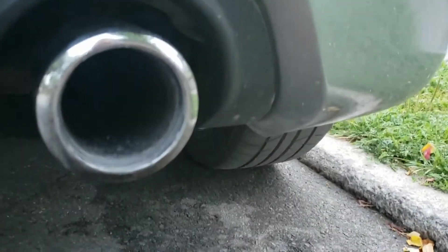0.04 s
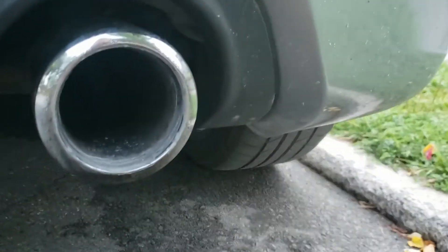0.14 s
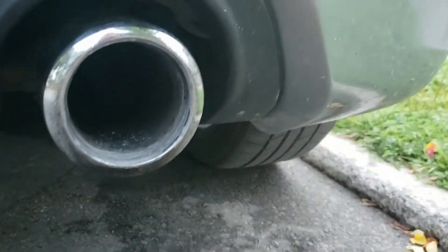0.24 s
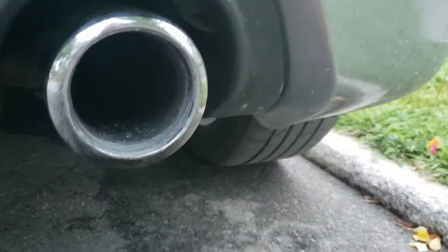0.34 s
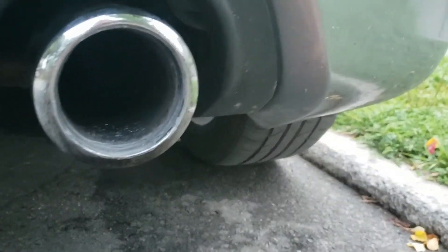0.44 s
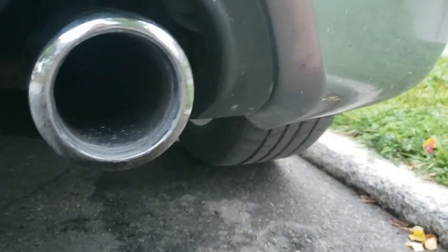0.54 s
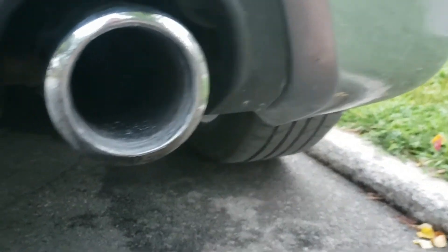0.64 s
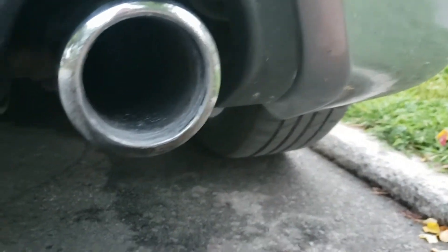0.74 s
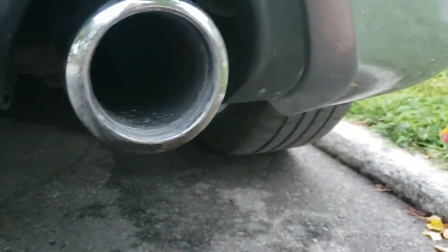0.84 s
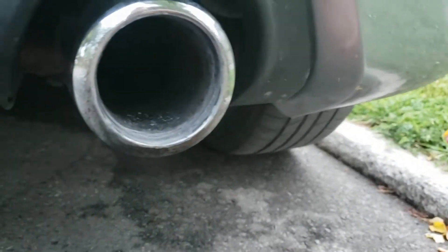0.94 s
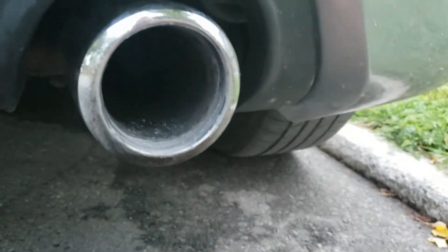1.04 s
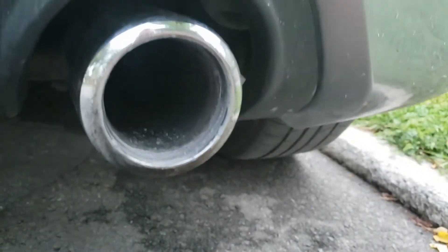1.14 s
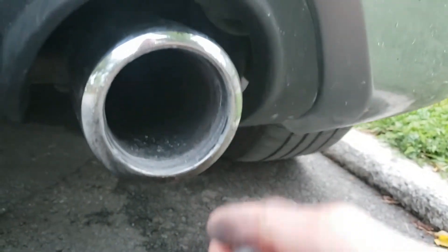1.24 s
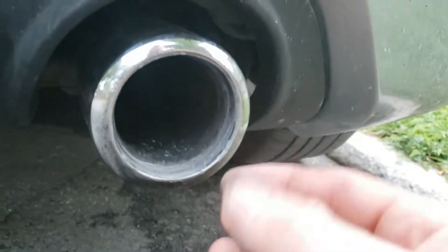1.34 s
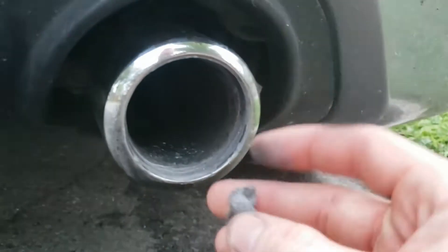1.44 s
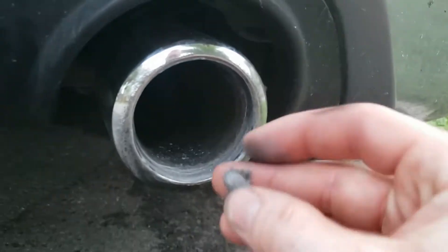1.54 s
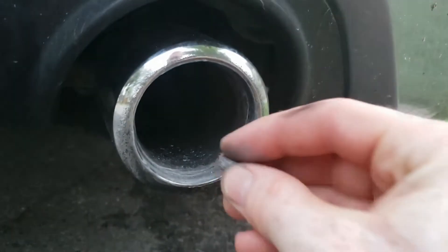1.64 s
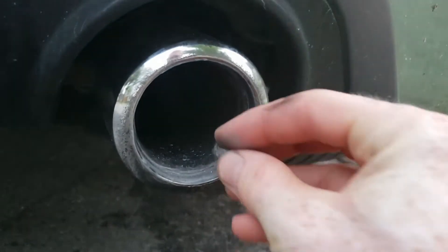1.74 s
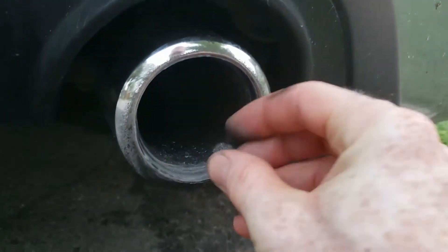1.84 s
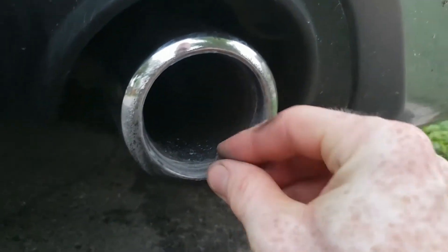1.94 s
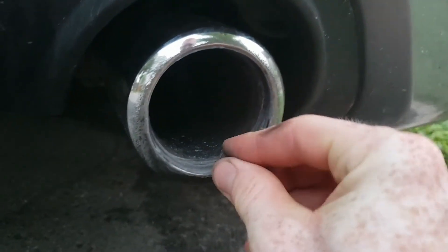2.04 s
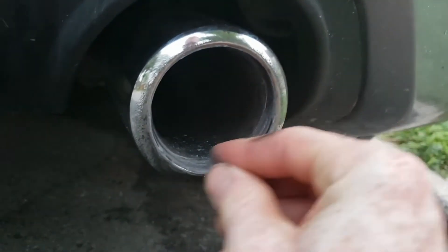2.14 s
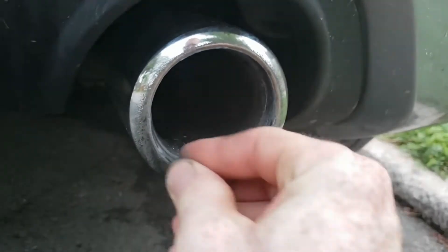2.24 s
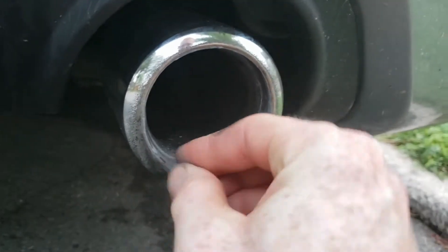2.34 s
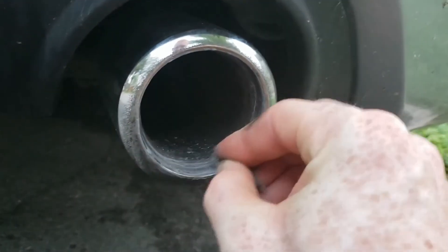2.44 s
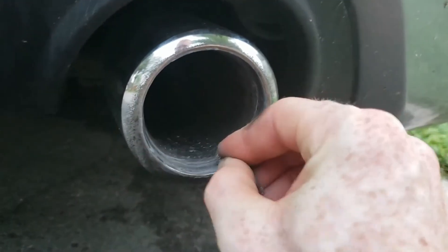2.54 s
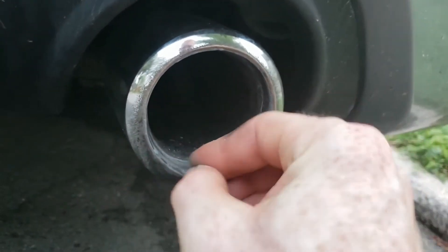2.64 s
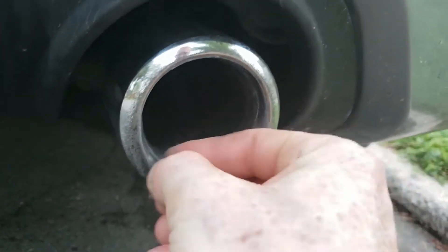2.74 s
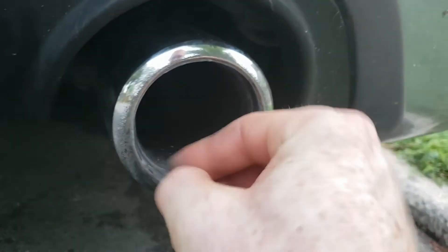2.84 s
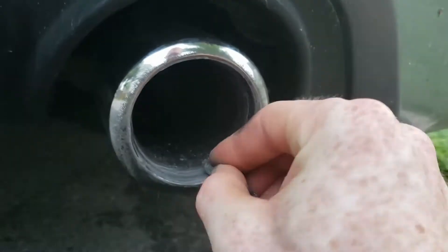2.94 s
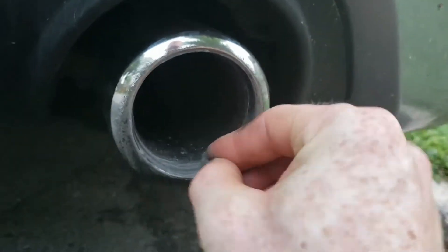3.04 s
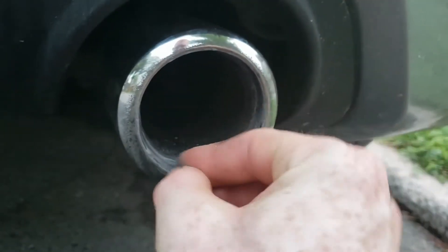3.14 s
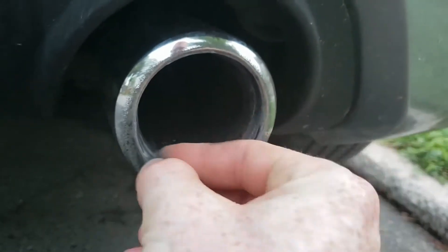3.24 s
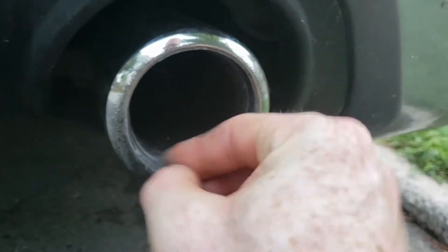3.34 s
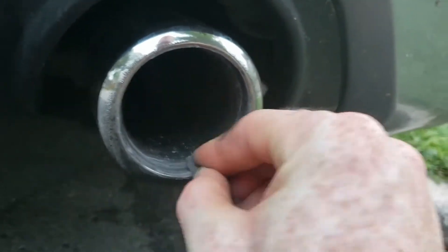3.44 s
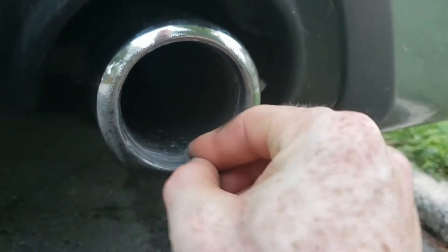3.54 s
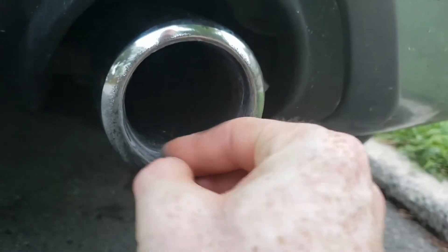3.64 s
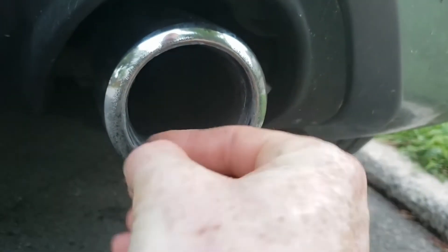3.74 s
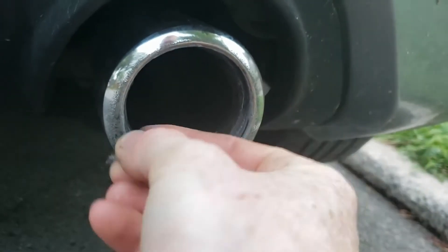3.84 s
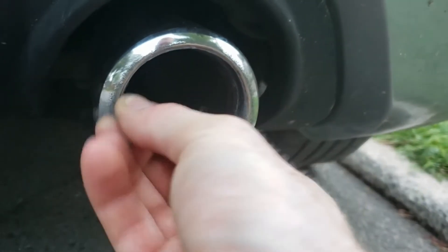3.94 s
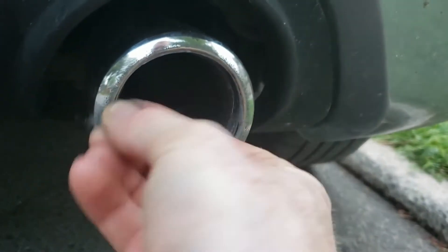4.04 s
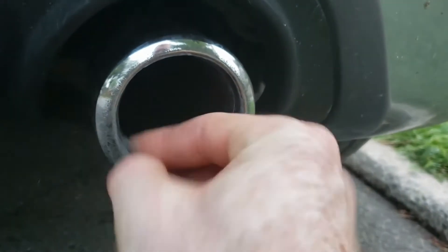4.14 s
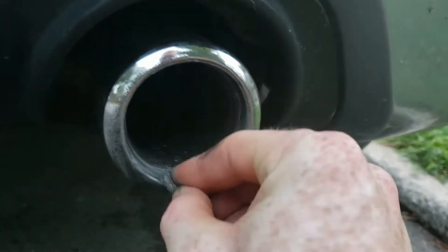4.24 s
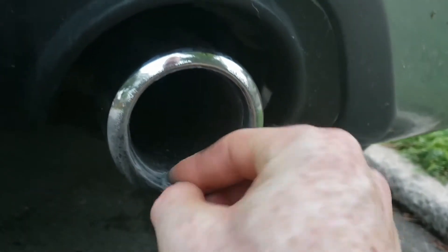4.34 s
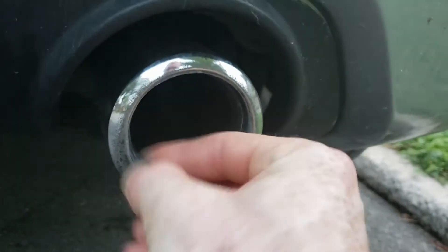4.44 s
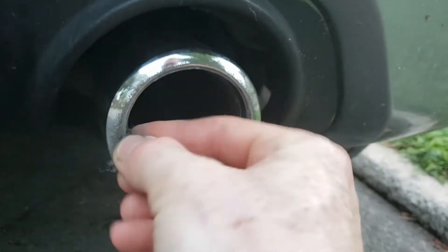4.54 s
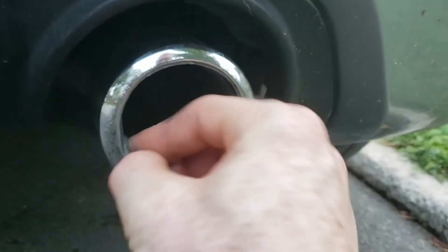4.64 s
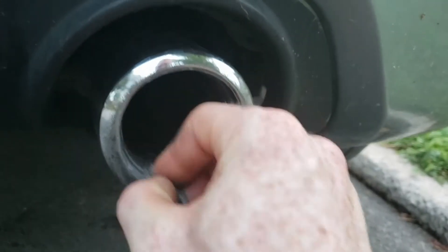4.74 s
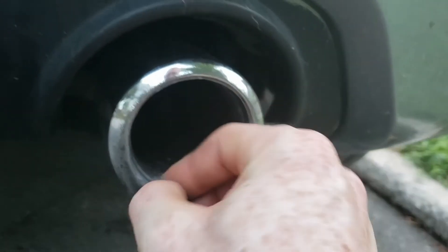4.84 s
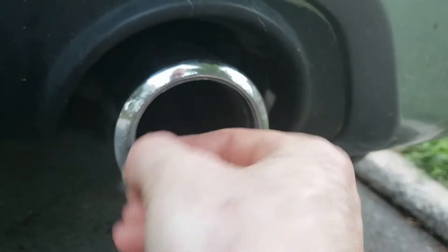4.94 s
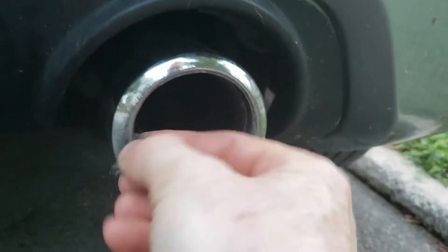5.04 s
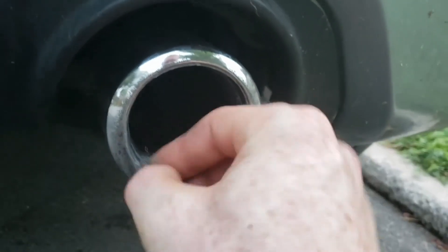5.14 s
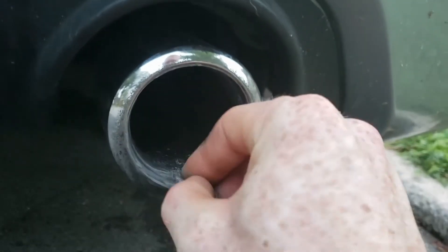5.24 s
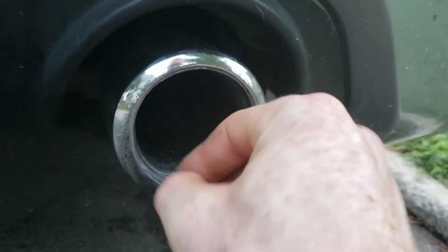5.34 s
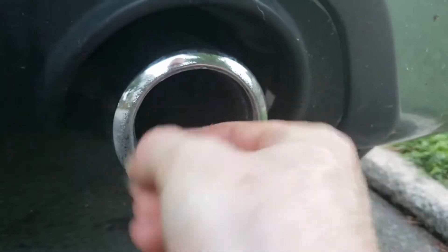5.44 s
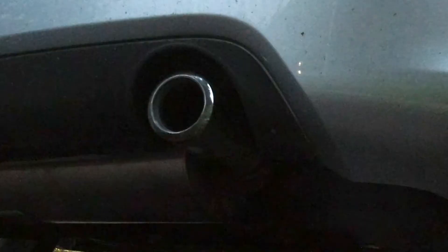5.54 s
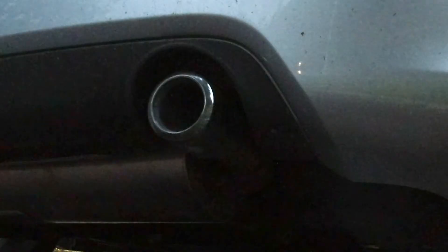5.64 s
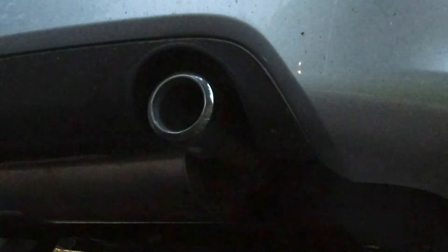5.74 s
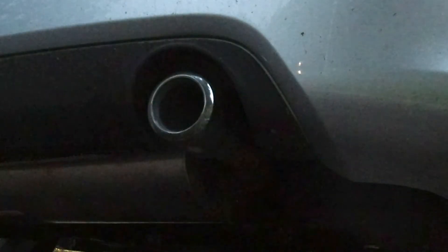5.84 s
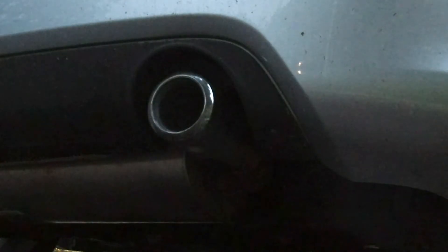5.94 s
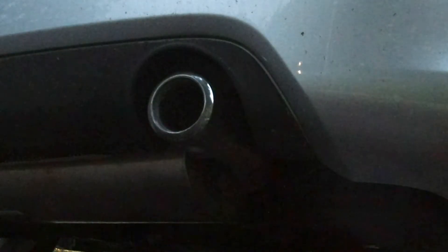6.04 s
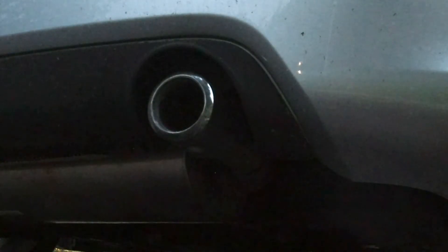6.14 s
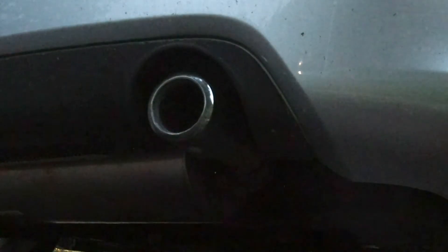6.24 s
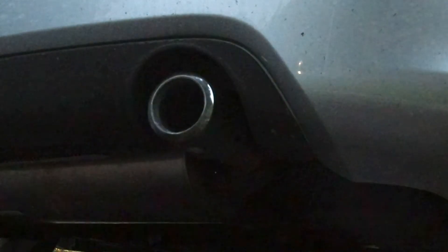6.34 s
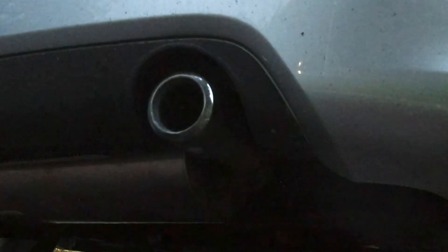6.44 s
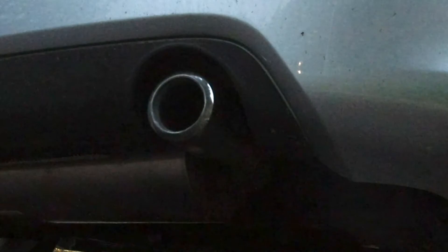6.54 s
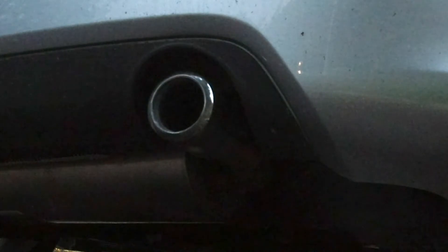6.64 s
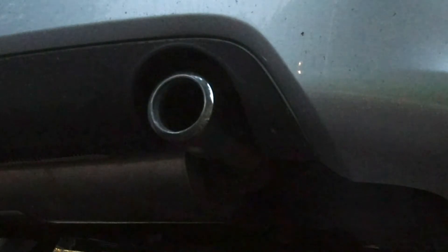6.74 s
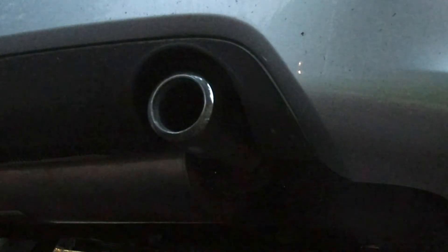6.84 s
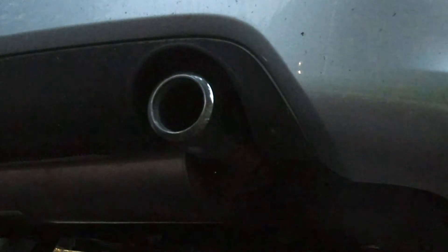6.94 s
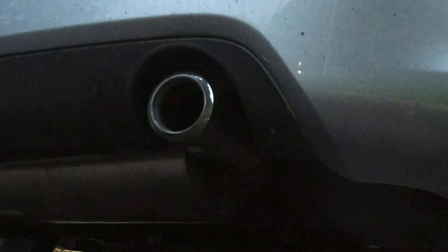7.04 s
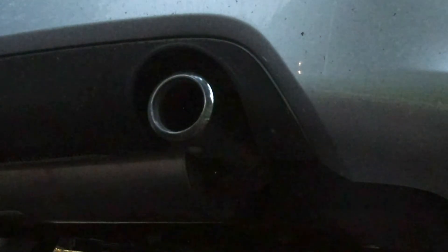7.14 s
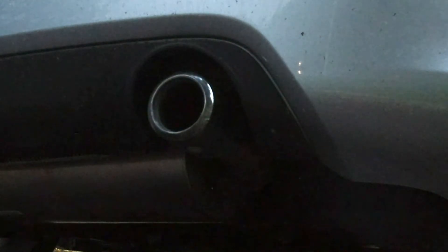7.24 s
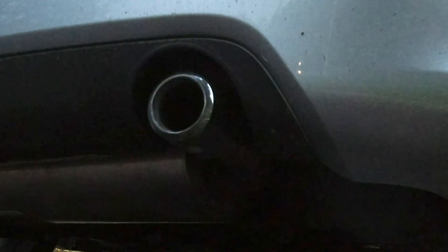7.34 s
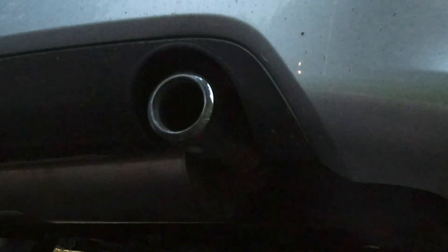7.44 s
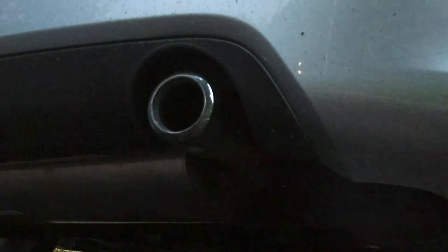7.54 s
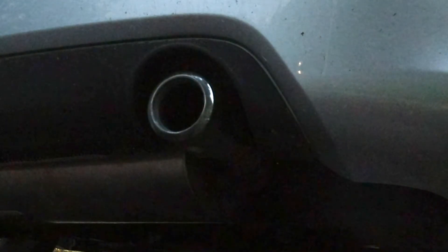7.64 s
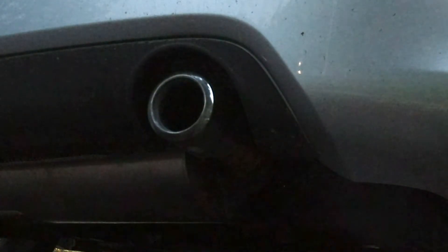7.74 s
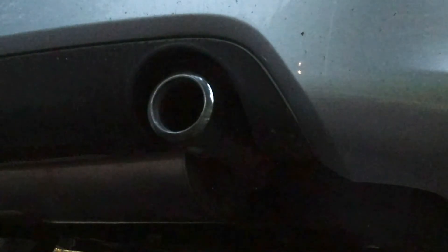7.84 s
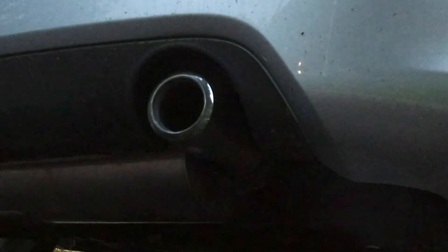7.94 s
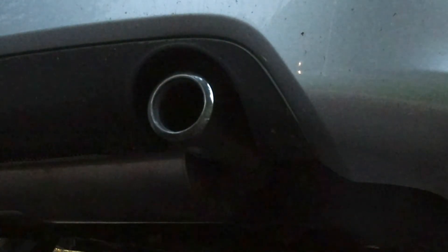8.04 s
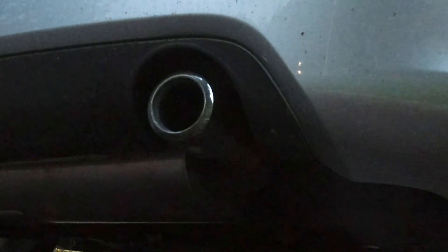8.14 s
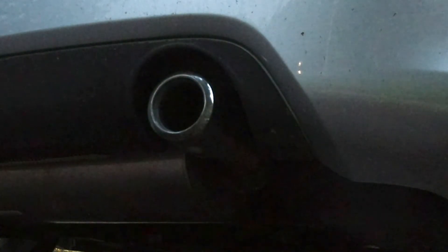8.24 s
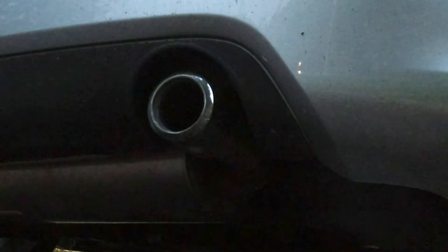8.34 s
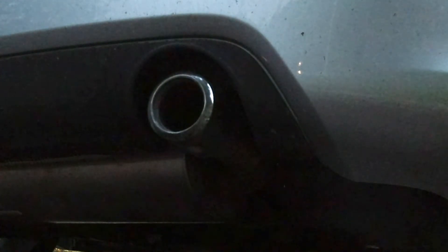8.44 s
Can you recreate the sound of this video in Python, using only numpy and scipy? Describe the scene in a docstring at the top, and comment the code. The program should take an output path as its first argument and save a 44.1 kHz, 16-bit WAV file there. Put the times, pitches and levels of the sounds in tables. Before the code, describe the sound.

Faint traffic rumbles in the open air before quick, uneven rubbing starts near the microphone, a metal pad hissing on an exhaust tip and drawing a light ring from it. Suddenly a starter clacks and chugs six times with a whirring whine. The car engine fires and runs at a fast idle, much louder than the scrubbing, booming and barking right at the tailpipe and faltering briefly twice.

```python
"""Outdoors, close to a car's chrome exhaust tip, with traffic rumbling in the distance.
Fingertips scrub the tip with a small metal pad; each stroke hisses and lightly rings the tube.
Then, at once, the microphone is by a tailpipe: the starter clacks in and cranks through six
compressions, the first puff faint. The engine catches and settles into a loud fast idle,
booming and barking out of the silencer, that stumbles twice."""
import sys
import numpy as np
from scipy import signal
from scipy.fft import rfft, irfft
from scipy.io import wavfile
from scipy.ndimage import uniform_filter1d

SR = 44100
rng = np.random.default_rng(int(sys.argv[2]) if len(sys.argv) > 2 else 0)


def transcribe(u):
    """Save the signal u as a 16-bit wav file named by the first command-line argument.

    u: samples, shape (n,) or (channels, n), limited to [-1, 1]; the rate is SR.
    q: integer samples, one column per channel.
    """
    v = np.clip(np.atleast_2d(u).T, -1, 1)
    q = np.round(v * 32767).astype(np.int16)
    wavfile.write(sys.argv[1], SR, q)


N = 374409
START_S, CATCH_S, IDLE_S = 5.508, 6.38, 6.6  # the starter engages, the engine catches, the idle settles


IDLE_HZ = 51.42
BOOM_DB, BOOM_SAG_DB_PER_S = -22, 1  # the boom eases as the idle settles
OCTAVE_DB, OCTAVE_RISE_DB_PER_S = -44, 5.5  # its octave grows meanwhile
BARK_DB, BARK_SAG_DB_PER_S = -27.1, 0.93
FLARE_S, FLARE_LENGTH_S, FLARE_DB = 6.485, .035, 4  # the boom swells as the revs overshoot once
# The pressure pulse below the silencer's resonances. Each row: frequency in Hz, gain in dB.
PULSE_BASS = [(10, -9), (50, -8)]
# The silencer, heard at the pipe's mouth. Each row: multiple of the idle firing rate, gain in dB.
SILENCER = [(1, -0.5), (2, -19), (3, -10.5), (4, -8), (5, -17), (6, -17), (7, -22.5), (8, -34), (9, -32),
            (10, -20), (11, -37), (12, -33), (13, -31), (14, -31), (15, -49), (16, -48.5)]
def exhaust(cycles):
    """Close to the tailpipe, every firing booms out of the silencer with a sharp bark on its crest."""
    age = np.maximum(clock() - CATCH_S, 0)
    uneven_db, boom_loss_db, bark_loss_db = stumbling()
    boom_db = BOOM_DB - BOOM_SAG_DB_PER_S * age - boom_loss_db + FLARE_DB * bell(FLARE_S, FLARE_LENGTH_S)
    bark_db = BARK_DB - BARK_SAG_DB_PER_S * age - bark_loss_db + 0.67 * wander(12)
    firings = np.flatnonzero(np.diff(np.floor(cycles)))
    size_luck, timing_luck, boom_luck = rng.standard_normal((len(firings), 3)).T
    scatter_db = 0.51 + uneven_db[firings]
    alternation_db = .2 * (-1) ** np.arange(len(firings))
    jitter = (.00015 * SR * scatter_db * timing_luck).astype(int)
    pulses = np.zeros(N)
    pulses[np.clip(firings + jitter, 0, N - 1)] = undb(alternation_db - .8 * scatter_db * abs(size_luck))
    pipe = colour(pulses, PULSE_BASS + [(k * IDLE_HZ, db) for k, db in SILENCER[1:]])
    bark = pipe / pipe[:, int(IDLE_S * SR):].std() * undb(bark_db)
    unevenness = np.interp(np.arange(N), firings, undb(0.76 * scatter_db * boom_luck))
    phase = 2 * np.pi * (cycles + 0.1)  # the slow swell of pressure leads the bark a little
    boom = np.cos(phase) * undb(boom_db)
    octave = np.cos(2 * phase) * undb(OCTAVE_DB + OCTAVE_RISE_DB_PER_S * age)
    return np.sqrt(2) * (boom + octave) * unevenness + bark


# Uneven firing, once at the catch and twice at idle. Each row: centre and half-length in seconds,
# then scatter, loss of boom and loss of bark in dB.
STUMBLES = [(6.423, .05, 3.5, 2.5, -1), (7.178, 0.057, 3, 5, 5), (7.92, 0.034, 1.5, 3, 3)]
def stumbling():
    """Firings come weak and out of step: scatter, loss of boom and loss of bark over time, in dB."""
    return sum(np.outer(depths, bell(s, length)) for s, length, *depths in STUMBLES)


# Tone of the gas rush, the stumbles' rumble and the spits. Each row: frequency in Hz, gain in dB.
GAS_COLOUR = [(20, 1), (80, -2.5), (140, -2), (280, -1), (380, -8.5), (460, -3), (550, -9), (590, -15),
              (650, -11.5), (690, -5), (730, -15.5), (790, -18.5), (1000, -17), (1500, -35.5)]
RUMBLE_COLOUR = [(60, -8), (100, 1), (160, -5), (260, -13.5), (420, -19.5)]
SPIT_COLOUR = [(250, -9), (480, 4.5), (720, 1), (900, -19), (1300, -19.5)]
# Harder spits of gas. Each row: start in seconds, level in dB, decay in seconds.
SPITS = [(6.527, -35, 0.014), (6.756, -45, 0.0085), (7.044, -37, 0.011), (7.084, -32, 0.013),
         (7.383, -36.5, 0.0081), (7.48, -36, .012), (8.397, -41, 0.009)]
def gas_flow(throb):
    """Gas rushes out after each firing, spits now and then, and rumbles in the silencer in a stumble."""
    rush = car_noise() * throb
    gas = unit_rms(colour(rush, GAS_COLOUR)) * undb(-41.3 + wander(14))
    scatter_db = stumbling()[0]
    rumble = unit_rms(colour(rush, RUMBLE_COLOUR)) * undb(-42) * scatter_db
    spits = unit_rms(colour(rush, SPIT_COLOUR)) * bursts(SPITS)
    return gas + rumble + spits


# Machinery hiss, heard from the tailpipe. Each row: frequency in Hz, gain in dB.
MACHINE_COLOUR = [(600, -14), (950, 2), (1200, -7), (1550, -5.5), (2000, -8), (2250, -7.5), (2600, -6.5),
                  (3200, -9.5), (3800, -11.5), (4600, -18.5), (6200, -18.5), (7200, -24), (9000, -20.5),
                  (10200, -22.5), (15800, -20)]
# Its whistling resonances. Each row: frequency in Hz, width in Hz, gain in dB.
MACHINE_MODES = [(1420, 52, 1), (1765, 22, -3), (2560, 55, 4), (3110, 70, 1), (8600, 41, -5),
                 (8940, 100, -3.5), (11300, 190, -14), (15400, 80, -5)]
def machinery(throb):
    """The machinery hisses and whistles behind the exhaust, loudest just after the engine catches."""
    clatter = metal_wall(car_noise(), decay=0.006, direct_db=10)
    clatter = clatter * undb(wander(300) + 0.88 * wander(18)) * (1 + 0.13 * throb)
    hiss = unit_rms(colour(clatter, MACHINE_COLOUR), 1510, 14400)
    whistle = undb(-11) * unit_rms(ring(clatter, MACHINE_MODES))
    flare = 1 + bursts([(6.375, 4, 0.125)])
    return (hiss + whistle) * flare * undb(-53.5)


# Speed of the running engine. Each row: time in seconds, firing rate in Hz.
FIRING_RATE = [(6.38, 42.03), (6.43, 45.9), (6.48, 54.5), (6.5, 55), (6.56, 51.9), (6.73, 52.7),
               (7.02, 52.17), (7.16, 48), (7.25, 50.88), (7.4, 51.55), (7.55, 50.07), (7.77, 51.67),
               (7.94, 50.02), (8.08, 51.14), (8.2, 49.35), (8.42, 49.1), (8.49, 50)]
def engine():
    """The running engine: its firings pace the exhaust, the gas flow and the machinery."""
    times, rates = np.transpose(FIRING_RATE)
    firing_hz = uniform_filter1d(np.interp(clock(), times, rates), size=400)
    cycles = np.cumsum(firing_hz) / SR
    cycles -= np.interp(7.083, clock(), cycles)  # one firing falls on the hardest spit
    throb = 1.3 + np.exp(-(cycles % 1) / 0.14)
    return (gas_flow(throb) + machinery(throb) + exhaust(cycles)) * fade(6.36, 6.39)


PUFF_HZ, PUFF_DECAY_S = 23, .043
# Compressions while cranking. Each row: time in seconds, puff of air in dB, clash of gear teeth in dB.
COMPRESSIONS = [(5.545, -45, -35.5), (5.687, -28.5, -39.5), (5.853, -25, -31), (5.992, -26, -32),
                (6.131, -24.5, -32.5), (6.268, -25, -43)]
# The first two firings. Each row: time in seconds, level in dB, swing in Hz, decay in seconds.
FIRST_FIRINGS = [(6.323, -18, 58, .029), (6.361, -15, 56.5, 0.013)]
def puffs():
    """Each slug of air leaves the pipe as a pressure peak that swings out slowly."""
    cranking = [(s, db, PUFF_HZ, PUFF_DECAY_S) for s, db, _ in COMPRESSIONS]
    pressure = 0
    for s, db, hz, decay in cranking + FIRST_FIRINGS:
        age = clock() - s
        rise = np.exp(-abs(age) * hz * 7)
        swing = np.cos(2 * np.pi * hz * age) * np.exp(-abs(age) / decay)
        pressure = pressure + undb(db) * np.where(age < 0, rise, swing)
    return pressure


OVERRUN_S, OVERRUN_HOLD_S = 6.285, 0.083  # the catching engine spins the starter free
# The pinion striking the ring gear. Each row: start in seconds, level in dB, decay in seconds.
CLACKS = [(5.5105, -25.5, 0.0053), (5.5145, -29.5, 0.0057), (5.523, -31, 0.015)]
# Tone of those strikes. Each row: frequency in Hz, gain in dB.
CLACK_COLOUR = [(120, -47), (200, -5), (485, -15), (581, -7), (946, -1), (1310, -8.5), (2550, 1),
                (2950, -5), (4090, -11), (4550, -6.5), (5550, -17), (12500, -21.5), (15000, -33)]
def starter():
    """Heard from the tailpipe, the pinion clacks in and the starter labours until the engine catches."""
    age = np.clip(clock() - START_S, 0, OVERRUN_S - START_S)
    surge = cranking_surge()
    overrun = undb(hump(OVERRUN_S, OVERRUN_HOLD_S, attack=0.037, release=.085))
    rattle = gear_rattle(overrun)
    chugs = gear_chugs()
    running = rattle + motor_whirr(age, surge, overrun) + gear_whine(age, surge) + body_drone(age, surge)
    clack = unit_rms(colour(car_noise(), CLACK_COLOUR)) * bursts(CLACKS)
    return clack + chugs + running * fade(START_S, 5.52) * (1 - fade(6.39, 6.48))


def cranking_surge(lag_s=0.032):
    """Swing of the cranking speed from -1 to 1: each compression brakes the starter, then lets it race."""
    fastest = np.array(COMPRESSIONS)[:, 0] + lag_s
    return np.cos(2 * np.pi * np.interp(clock(), fastest, np.arange(len(fastest))))


# Tone of the clashing teeth. Each row: frequency in Hz, gain in dB.
CHUG_COLOUR = [(200, -13.5), (360, -3), (520, -14), (700, -9), (950, -0.5), (1350, -10.5), (1800, -1),
               (2200, -6.5), (2800, -8), (3300, -12.5), (5300, -22), (7500, -27.5)]
def gear_chugs(lag_s=.065, decay_s=0.04):
    """The teeth are thrown together as each compression lets go."""
    blows = bursts([(s + lag_s, db, decay_s) for s, _, db in COMPRESSIONS])
    clash = colour(car_noise() * undb(1.2 * wander(500)), CHUG_COLOUR)
    return unit_rms(clash, 690, 3600) * uniform_filter1d(blows, size=600)


# Resonances of the starter gears. Each row: frequency in Hz, width in Hz, gain in dB.
GEAR_MODES = [(988, 57, 6), (1497, 17, 8), (1890, 56, 1), (2355, 93, 1), (2740, 130, 0), (4080, 40, -3),
              (4580, 78, -7), (5220, 66, -5)]
# Their broad noise. Each row: frequency in Hz, gain in dB.
GEAR_COLOUR = [(350, -34.5), (600, -13), (977, -1), (1410, -10), (1890, -9), (2160, -4), (2400, 1),
               (3330, -11), (8000, -28), (10400, -47), (17600, -120)]
def gear_rattle(overrun):
    """Rattling teeth ring the gears, harder as the starter spins free."""
    teeth = car_noise() * undb(3.3 * wander(1500) + 1.1 * wander(90))
    gears = unit_rms(ring(teeth, GEAR_MODES)) + undb(-1) * unit_rms(colour(teeth, GEAR_COLOUR))
    dulled = signal.sosfilt(signal.butter(2, 4500, fs=SR, output="sos"), gears)
    return unit_rms(dulled, 950, 2700) * undb(-46) * (1 + 0.59 * overrun)


WHIRR_DB, WHIRR_RISE_DB_PER_S, WHIRR_SWING_DB, OVERRUN_DB = -61, 20.5, 4.5, -41
# Tone of the starter motor. Each row: frequency in Hz, gain in dB.
WHIRR_COLOUR = [(3000, -7.5), (4000, 2), (4500, -4.5), (5300, -1.5), (6800, -7.5), (9000, -5.5),
                (12500, -6.5), (14500, -20), (15800, -17)]
def motor_whirr(age, surge, overrun):
    """The motor's whirr grows and surges with the cranking, then peaks as it spins free."""
    cranking = undb(WHIRR_DB + WHIRR_RISE_DB_PER_S * age + WHIRR_SWING_DB * surge)
    cranking *= 1 - fade(OVERRUN_S, CATCH_S)
    motor = colour(metal_wall(car_noise(), decay=0.0054, direct_db=-1), WHIRR_COLOUR)
    return unit_rms(motor, 6050, 15000) * np.maximum(cranking, undb(OVERRUN_DB) * overrun)


def gear_whine(age, surge, full_speed_hz=4250, spin_up_s=.045):
    """Two sets of gears mesh at different rates, each wavering in level on its own."""
    mesh_hz = full_speed_hz * (1 - np.exp(-age / spin_up_s)) * (1 + .07 * surge)
    warble = 1 + .027 * np.array([wander(600), wander(600)])
    phase = 2 * np.pi * np.cumsum(mesh_hz * warble, axis=1) / SR
    low = undb(-50 + 4 * wander(35)) * np.sin(phase)
    high = undb(-54 + 3.4 * wander(35)) * np.sin(phase * 6 / 5)
    return (low + high) * fade(5.57, 5.7) * (1 - fade(6.2, 6.35))


# Low resonances of the body. Each row: frequency in Hz, width in Hz, gain in dB.
BODY_MODES = [(90.1, 40, 5), (129, 55, -5), (259, 56, 0), (342.4, 36, -1.5), (517, 43, -5), (734, 52, -9)]
def body_drone(age, surge, rise_db_per_s=7):
    """The body drones under the cranking, louder whenever the starter slows."""
    drone = unit_rms(ring(car_noise(), BODY_MODES), 200, 700)
    return drone * undb(-50 + rise_db_per_s * age - 1.5 * surge)


STROKE_ATTACK_S, STROKE_RELEASE_S, RING_RELEASE_S = .06, 0.05, 0.078
STROKE_SAG_DB_PER_S = 20  # the pad presses hardest as it sets off
RING_SWELL_DB_PER_S, RING_LAG_S = 25, 0.0086
REST_DB, REST_RING_DB = -70, -78  # the pad stays in light contact between strokes
# Strokes of the pad. Each row: start and length in seconds, then the levels in dB of the friction,
# the lower rim's ring and the side rim's ring.
STROKES = [(1.956, 0.057, -61.5, -73, -78.5), (2.088, 0.084, -62.5, -68, -72),
           (2.189, 0.093, -46, -50.5, -74), (2.422, 0.065, -44.5, -56, -66), (2.65, 0.052, -44, -50.5, -70),
           (2.743, 0.034, -44, -49.5, -59.5), (2.904, 0.054, -44, -54, -69), (3.124, 0.14, -47, -49, -64),
           (3.407, 0.039, -46.5, -56.5, -68), (3.626, 0.17, -47.5, -51, -66),
           (3.873, .005, -49, -62.5, -62), (3.961, 0.029, -47, -62.5, -54),
           (4.164, .104, -46, -59.5, -61.5), (4.433, .024, -51, -66, -66), (4.511, .02, -46, -61, -57),
           (4.696, .06, -44, -61, -57.5), (4.78, .025, -53, -68, -62), (4.928, .03, -48.5, -61.5, -68),
           (4.98, .045, -45.5, -61, -55), (5.153, 0.11, -43.8, -56, -62), (5.408, .035, -44, -56, -66),
           (5.492, .016, -43.5, -54, -56)]
def pad_strokes():
    """Gains of the friction and the two rings: each stroke bites and eases off while the ring builds."""
    t = clock()
    friction, lower, side = undb(REST_DB), undb(REST_RING_DB), undb(REST_RING_DB)
    for start, length, friction_db, lower_db, side_db in STROKES:
        press_db = hump(start, length, STROKE_ATTACK_S, STROKE_RELEASE_S)
        press_db -= STROKE_SAG_DB_PER_S * np.clip(t - start, 0, length)
        ring_db = hump(start + RING_LAG_S, length, STROKE_ATTACK_S, RING_RELEASE_S)
        ring_db -= RING_SWELL_DB_PER_S * np.clip(start + length - t, 0, length)
        friction = np.maximum(friction, undb(friction_db + press_db))
        lower = np.maximum(lower, undb(lower_db + ring_db))
        side = np.maximum(side, undb(side_db + ring_db))
    return friction, lower, side


PRESSURE_WOBBLE_DB = 1.05  # the fingers never press evenly
# The tip rubbed on its lower rim and at its side. Each row: mode in Hz, width in Hz, gain in dB.
LOWER_RIM_MODES = [(960, 15, -12.5), (1083, 46, -16), (1143, 28, -4), (1464, 27, -9.5), (1528.5, 14, 4),
                   (1910, 43, -13.5), (3350, 46, -14.5), (6330, 46, -11.5), (7580, 18, -7)]
SIDE_RIM_MODES = [(567, 38, -4), (980, 29, -18.5), (1160, 26, -23), (1353, 18, 6), (1920, 29, -5.5),
                  (2510, 22, -11)]
# Tone of the pad on chrome. Each row: frequency in Hz, gain in dB.
FRICTION_COLOUR = [(500, -5.5), (1200, -4.5), (2100, -3.5), (3100, -0.5), (4000, -3.5), (5100, -1),
                   (5700, 2.5), (7000, 6.5), (8400, -5.5), (9300, -2), (11000, 0.5), (12150, 8),
                   (13700, 1.5), (15000, 3), (16000, 2)]
# Stereo width of the rubbing at the microphone. Each row: frequency in Hz, side minus centre in dB.
RUB_WIDTH = [(20, -16), (1000, 0), (8000, 1), (12500, -8), (20000, -13)]
def scrubbing():
    """Close by on the left, countless tiny slips of the pad hiss and feed the modes of the metal tip."""
    friction, lower_gain, side_gain = pad_strokes()
    slips = stereo_noise(RUB_WIDTH)
    slips *= undb(2.95 * wander(2500) + 1.4 * wander(120) + PRESSURE_WOBBLE_DB * wander(30))
    place = wander(6)  # the pad shifts along the rim and wakes different modes of the wall
    wall = metal_wall(slips, decay=0.01, direct_db=-4) * np.cos(place)
    wall += metal_wall(slips, decay=0.012, direct_db=-7.5) * np.sin(place)
    hiss = unit_rms(pan(colour(wall, FRICTION_COLOUR), left_db=7), 5000, 15400) * friction
    lower = unit_rms(pan(ring(slips, LOWER_RIM_MODES), left_db=9.5), 1470, 1620) * lower_gain
    side = unit_rms(pan(ring(slips, SIDE_RIM_MODES), left_db=7), 1290, 1355) * side_gain
    # one note rings on between strokes, fed until the hand moves to the side of the rim
    feed = slips * lower_gain * (clock() < 3.8)
    note = unit_rms(pan(ring(feed, [(1035, 2.9, 0)]), left_db=7.5)) * undb(-69)
    return (hiss + lower + side + note) * fade(1.47, 2.13)


# Faint far-off whistles, and swells of the low rumble.
# Each row: start and end in seconds, frequency and width in Hz, level in dB.
FAR_WHISTLES = [(-0.1, 0.16, 3500, 110, -74), (0.15, 0.98, 2960, 190, -70.5), (1.1, 2.0, 4900, 202, -85),
                (1.88, 2.9, 2990, 260, -71.5)]
RUMBLE_SWELLS = [(-0.2, 0.4, 148.8, 9.6, -45.5), (1.9, 2.45, 137.7, 10, -43.5), (2.5, 3.5, 125, 17, -46),
                 (4.6, 5.1, 146.7, 11, -49)]
def distant_swells():
    """Far from the microphone, narrow bands of sound come up and die away."""
    sound = 0
    for start, end, hz, width, db in FAR_WHISTLES + RUMBLE_SWELLS:
        mode = [(hz, 1.5 * width, 0)]  # two passes narrow the band again
        band = ring(ring(rng.standard_normal(N), mode), mode)
        arch = np.sqrt(abs(np.sin(np.pi * fade(start, end))))
        sound = sound + unit_rms(band) * undb(db) * arch
    return sound


# Distant traffic and open air. Each row: frequency in Hz, gain in dB.
OUTDOOR_COLOUR = [(25, -26), (50, -3.5), (80, 1), (160, -4), (300, -15.5), (700, -31.5), (1600, -37),
                  (2400, -30), (3000, -47), (3800, -56), (5000, -47.5), (7300, -47.5), (8300, -66),
                  (15000, -53.5)]
# Small handling ticks. Each row: start in seconds, level in dB.
TICKS = [(0.118, -59.5), (0.808, -56.5), (1.206, -62)]
def background():
    """Distant traffic rumbles under a faint diffuse hiss, far whistles and a few soft ticks."""
    air = stereo_noise([(20, -13), (110, -19.5), (380, -6), (900, 0.5), (20000, 0.0)])
    traffic = unit_rms(colour(air * undb(0.65 * wander(9)), OUTDOOR_COLOUR), 40, 400) * undb(-44.5)
    touches = uniform_filter1d(bursts([(s, db, .005) for s, db in TICKS]), size=130)
    ticks = unit_rms(colour(air, [(3500, 3), (5000, 2), (7000, 7), (8500, -10), (15000, -5)])) * touches
    return pan(traffic + ticks + distant_swells(), left_db=3)


# Stereo width of the car at the microphone. Each row: frequency in Hz, side minus centre in dB.
CAR_WIDTH = [(20, 4), (350, -28.5), (700, -14.5), (2400, -9), (4400, 1), (8000, 2), (14000, -6),
             (20000, -12)]
def car_noise():
    """Noise as wide as the car sounds from beside its tailpipe."""
    return stereo_noise(CAR_WIDTH)


def stereo_noise(width):
    """Noise whose side signal follows (Hz, dB) points."""
    mid, side = rng.standard_normal((2, N))
    return mid + colour(side, width) * np.array([[1], [-1]])


def metal_wall(x, decay, direct_db, size=4096):
    """The countless close modes of a metal wall, ringing on briefly behind the direct sound."""
    response = rng.standard_normal(size) * np.exp(-np.arange(size) / SR / decay)
    response /= np.linalg.norm(response)
    response[0] += undb(direct_db)
    return signal.oaconvolve(x, response[None], axes=1)[:, :N]


def ring(x, modes):
    """A bank of resonances (Hz, width Hz, dB)."""
    return sum(undb(db) * signal.lfilter(*signal.iirpeak(hz, hz / width, fs=SR), x)
               for hz, width, db in modes)


def colour(x, points, size=8192):
    """Minimum-phase filter through (Hz, dB) points, falling 24 dB an octave beyond both ends."""
    hz, db = np.transpose(points)
    octave = np.log2(np.maximum(np.arange(size // 2 + 1), .5) * SR / size)
    knots = np.log2(hz)
    gain_db = np.interp(octave, knots, db) - 24 * abs(octave - np.clip(octave, knots[0], knots[-1]))
    cepstrum = irfft(np.log(undb(gain_db)))[:size // 2]
    cepstrum[1:] *= 2
    response = irfft(np.exp(rfft(cepstrum, size)))
    return signal.oaconvolve(np.atleast_2d(x), response[None], axes=1)[:, :N]


def unit_rms(x, lo_hz=20, hi_hz=16000):
    """Scale so that the centre of the stereo image has rms 1 within a band."""
    hz = np.arange(N // 2 + 1) * SR / N
    band = rfft(np.atleast_2d(x).mean(axis=0))[(hz >= lo_hz) & (hz < hi_hz)]
    return x * N / np.sqrt(2 * np.sum(abs(band) ** 2))


def pan(x, left_db):
    """Lean a stereo sound to the left."""
    return x * undb(np.array([[left_db], [-left_db]]) / 2)


def wander(rate_hz):
    """Smooth random wandering with a spread near 1."""
    knots = np.arange(0, N, SR / rate_hz)
    return 1.2 * np.interp(np.arange(N), knots, rng.standard_normal(len(knots)))


def bursts(rows):
    """Envelope of sudden, decaying blows (start s, dB, decay s)."""
    t = clock()
    return sum(undb(db) * (t >= s) * np.exp(-abs(t - s) / decay) for s, db, decay in rows)


def hump(start, length, attack, release):
    """Level in dB that rises, holds at 0 and falls; attack and release are seconds per 20 dB."""
    t = clock()
    return -20 * (np.maximum(start - t, 0) / attack + np.maximum(t - start - length, 0) / release)


def bell(s, length):
    """Smooth bump of height 1 around a moment."""
    return np.exp(-((clock() - s) / length) ** 2)


def fade(t0, t1):
    """Ramp from 0 at t0 to 1 at t1."""
    return np.clip((clock() - t0) / (t1 - t0), 0, 1)


def undb(db):
    """Decibels to gain."""
    return 10 ** (np.asarray(db) / 20)


def clock():
    """Time of every sample in seconds."""
    return np.arange(N) / SR


def scene():
    """The scrubbing gives way abruptly to the engine start."""
    before = clock() < START_S
    return (background() + scrubbing()) * before + (starter() + puffs() + engine()) * ~before


def record(dry):
    """The recorder cuts the top above 15.8 kHz."""
    return signal.sosfilt(signal.ellip(10, .2, 70, 15800, fs=SR, output="sos"), dry)


dry = scene()
out = record(dry)
transcribe(out)
```